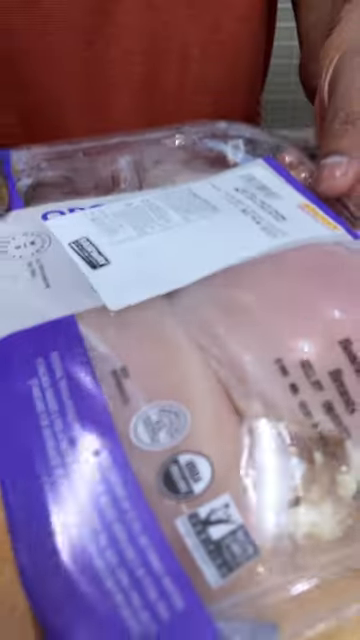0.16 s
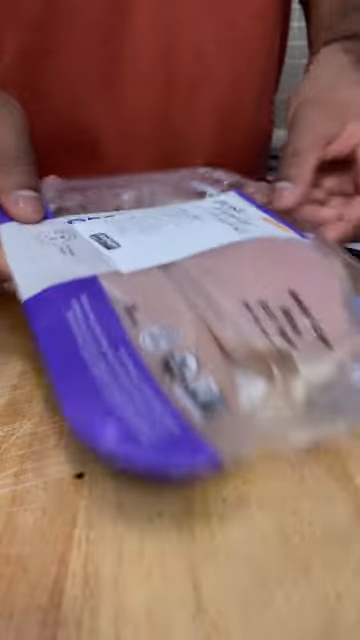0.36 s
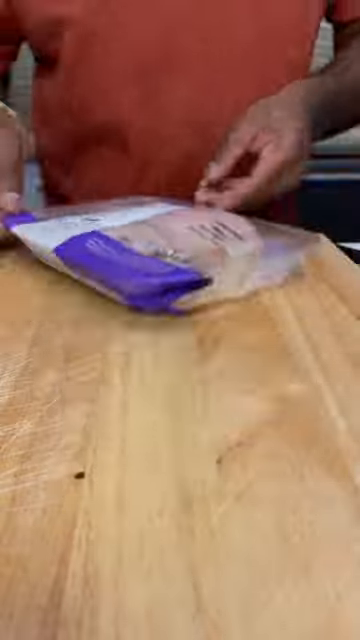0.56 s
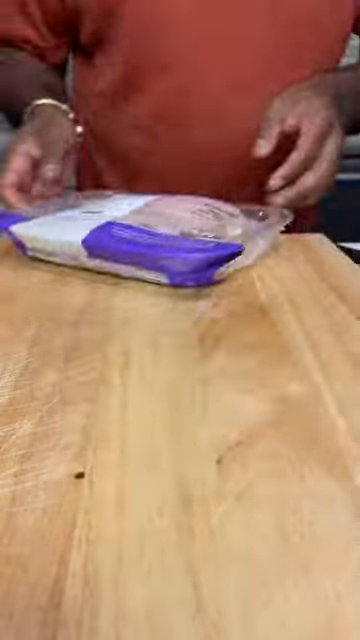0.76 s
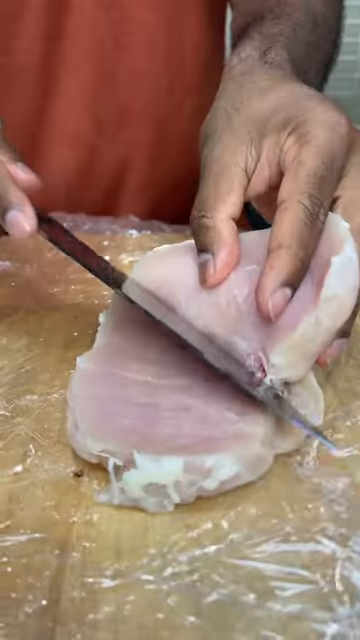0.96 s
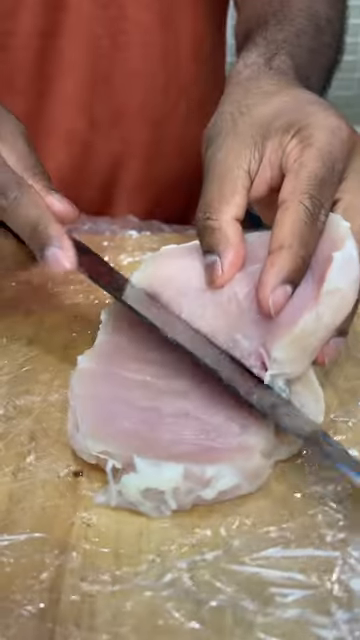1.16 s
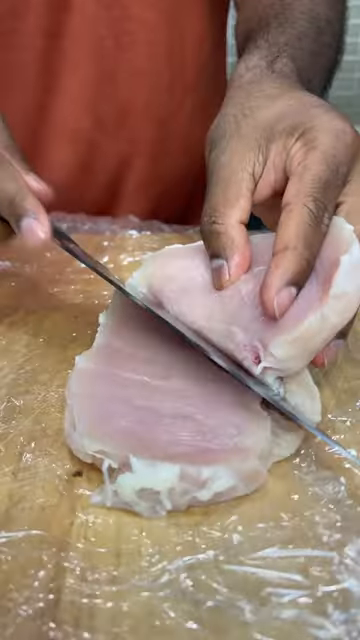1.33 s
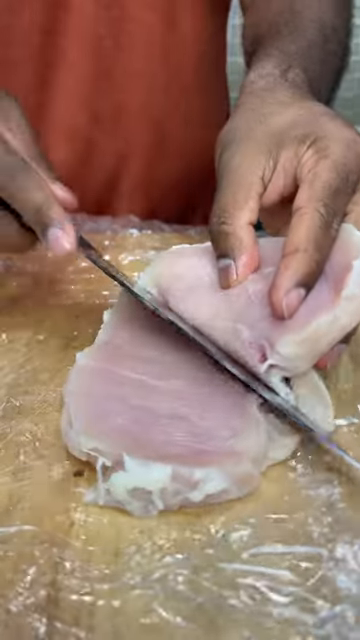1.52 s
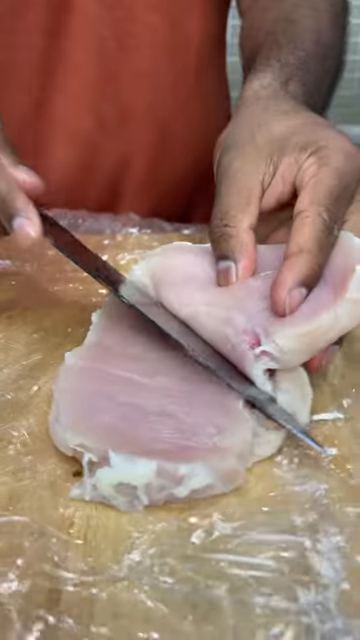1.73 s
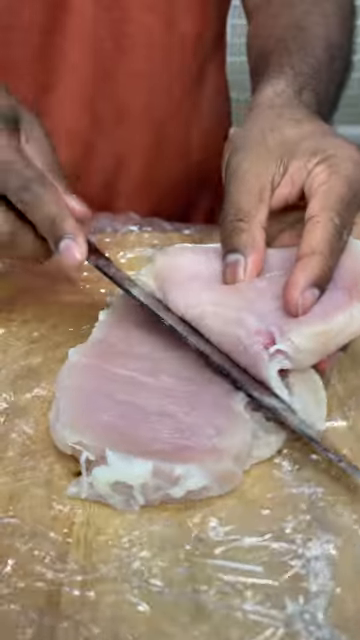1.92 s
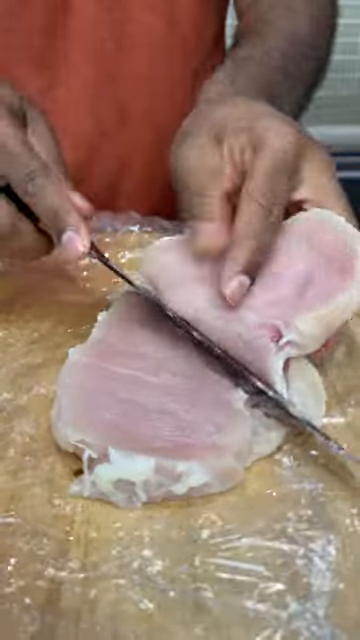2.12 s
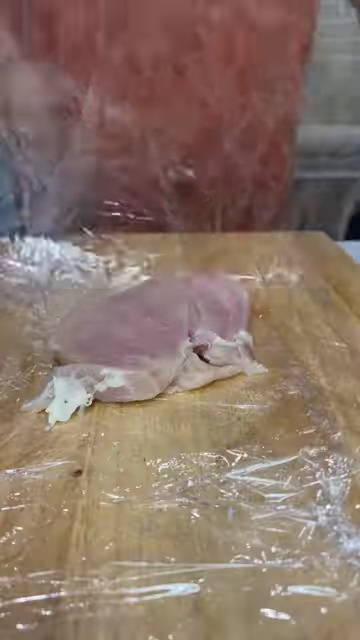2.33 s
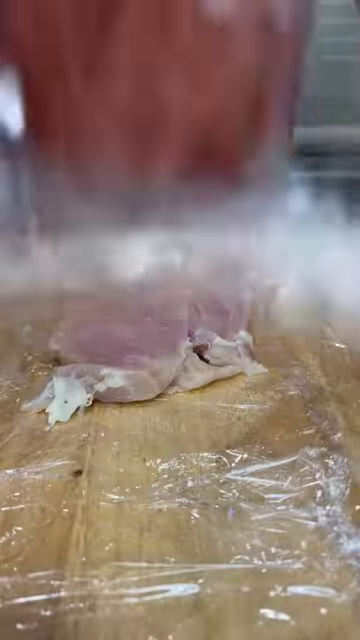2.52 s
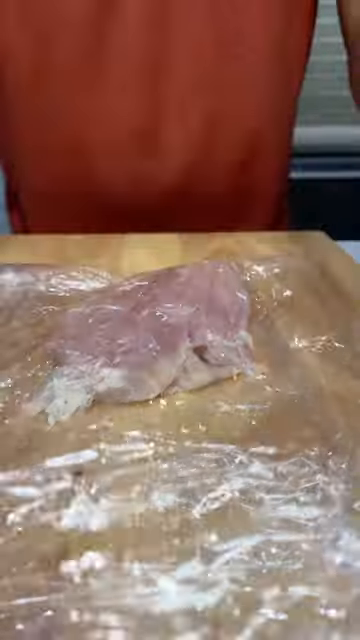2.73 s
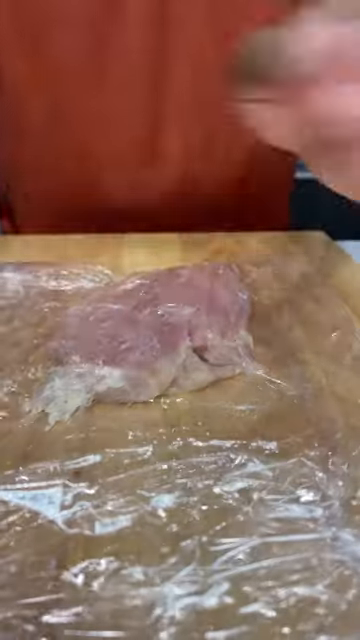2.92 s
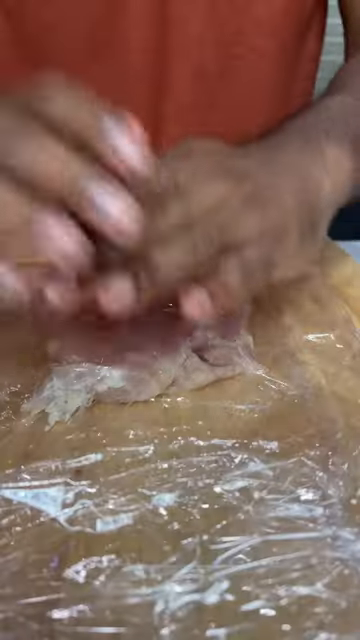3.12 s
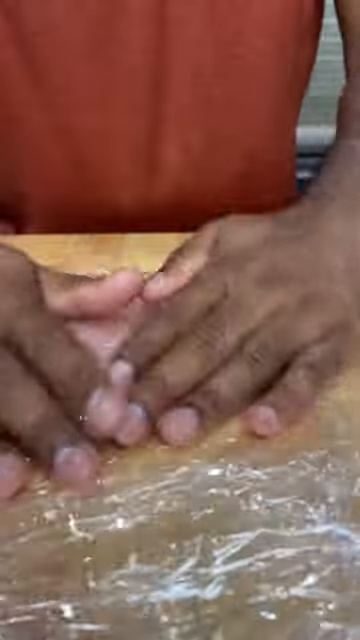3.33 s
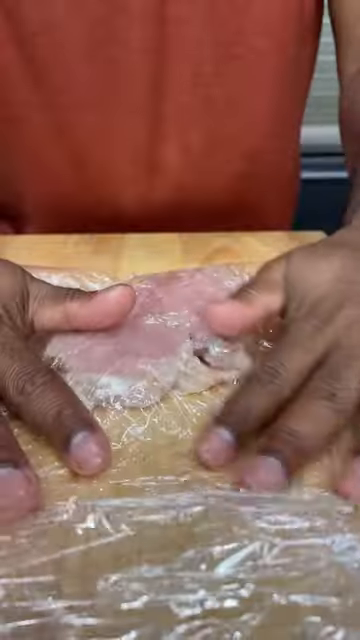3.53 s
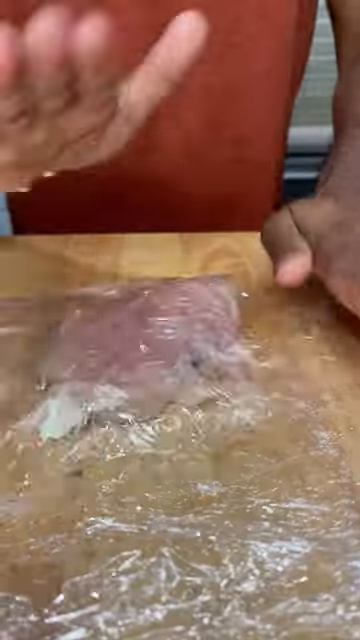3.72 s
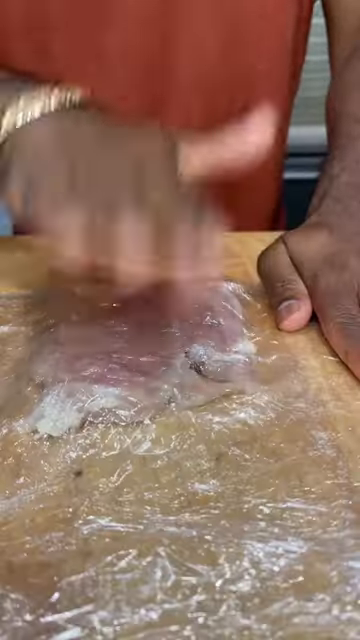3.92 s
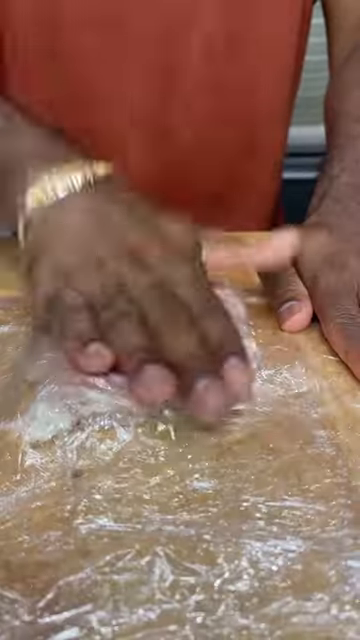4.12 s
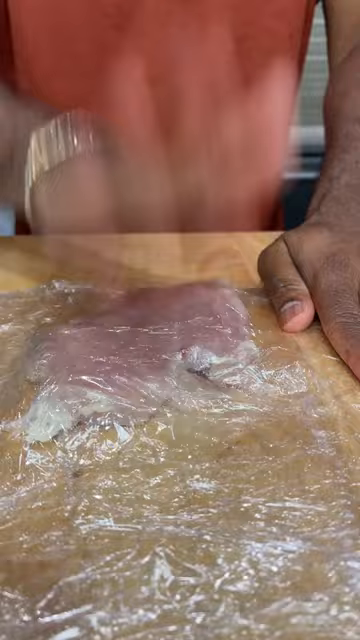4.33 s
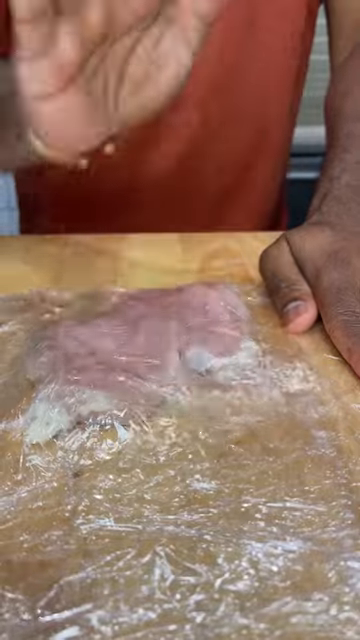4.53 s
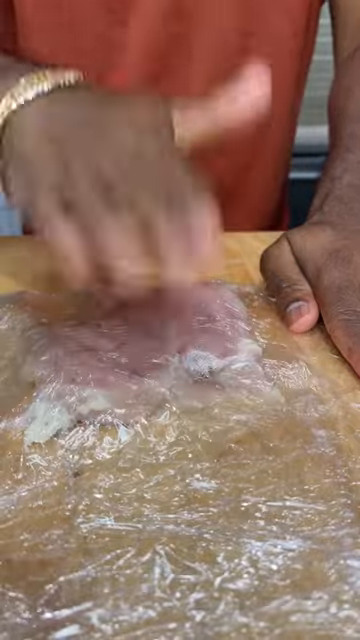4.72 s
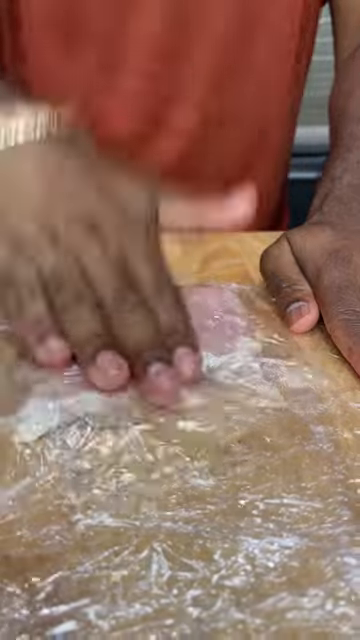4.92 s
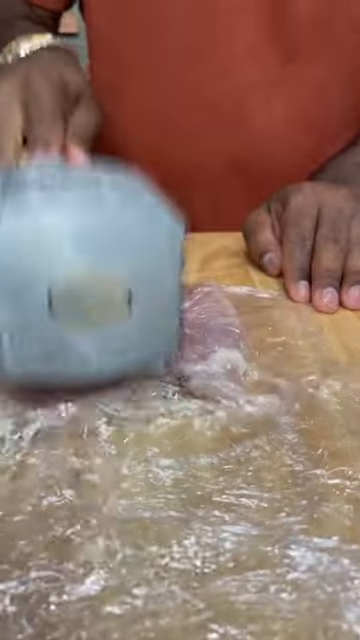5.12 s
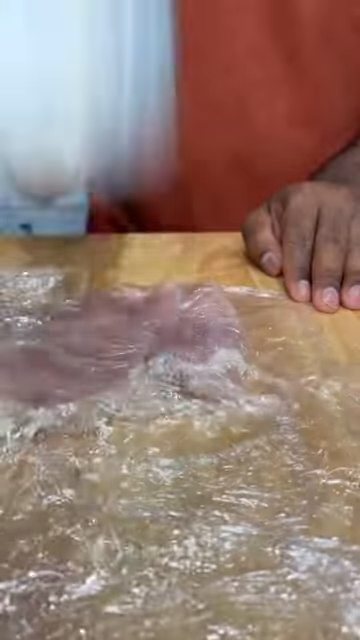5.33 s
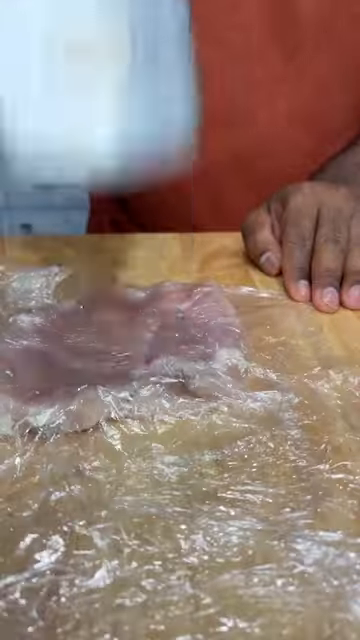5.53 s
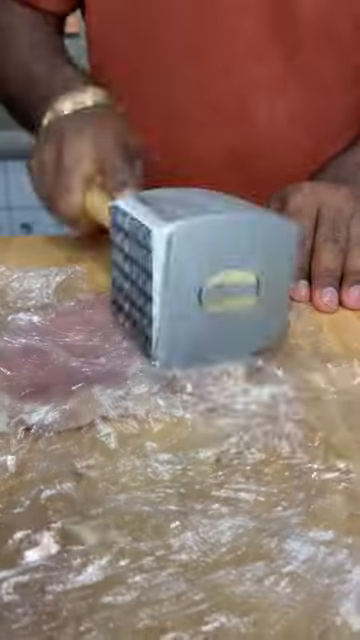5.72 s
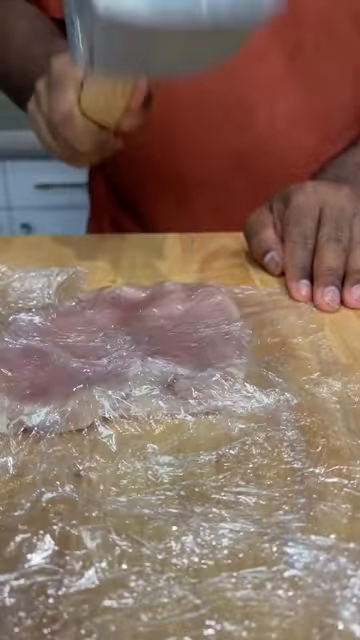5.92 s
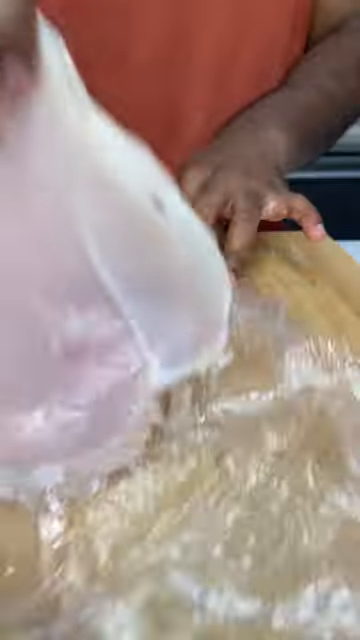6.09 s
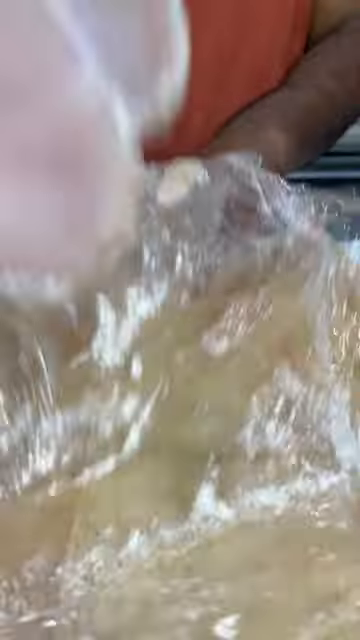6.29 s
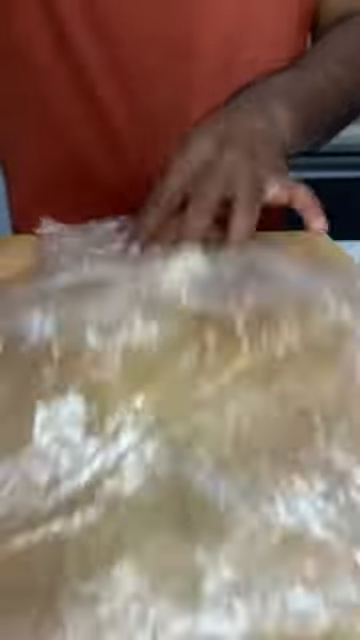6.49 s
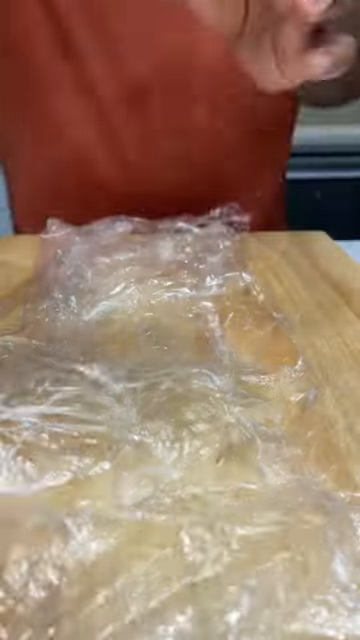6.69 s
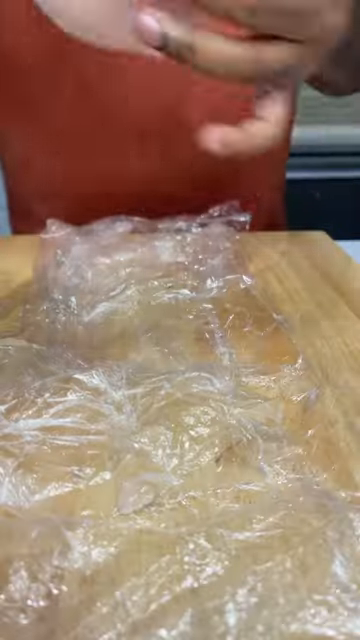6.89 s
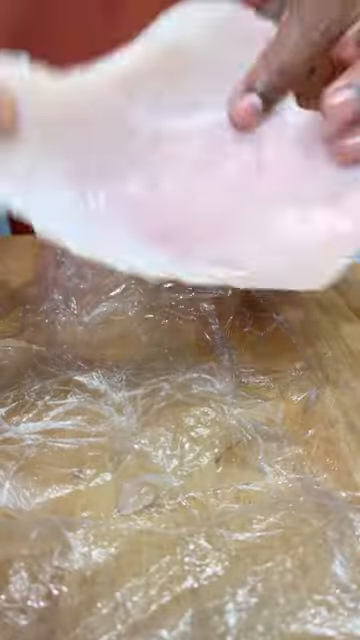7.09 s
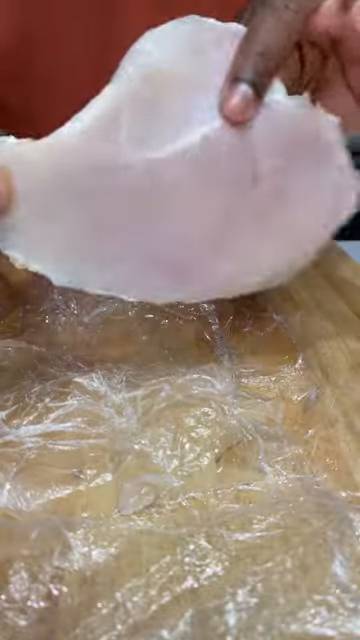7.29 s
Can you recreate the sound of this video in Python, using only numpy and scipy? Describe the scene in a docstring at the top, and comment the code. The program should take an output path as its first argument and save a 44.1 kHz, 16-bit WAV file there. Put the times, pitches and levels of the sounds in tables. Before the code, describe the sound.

A plastic tray slides, a knife cuts meat and cling film crinkles, then wet palm slaps and ringing mallet blows thump on a wooden board.

```python
"""A plastic tray slides and lands on a wooden board, a knife slices meat, cling film rustles, then
five palm slaps and four mallet blows flatten the meat through the film, over a low kitchen rumble.
Each blow is a wet crack of squeezed-out air, a falling thump of board and counter and a short hiss
of room and film; the mallet adds a metal ring. Film and scraping are clumped random clicks in noise;
board, counter and blade ring as damped modes. Two close microphone ports pick it all up."""
import sys
import numpy as np
from scipy import signal
from scipy.fft import rfft, irfft, next_fast_len
from scipy.io import wavfile

SR = 44100
rng = np.random.default_rng(int(sys.argv[2]) if len(sys.argv) > 2 else 0)


def int16_out(signal):
    """Quantize to a 16-bit WAV file."""
    q = np.round(np.clip(np.atleast_2d(signal).T, -1, 1) * 32767)
    wavfile.write(sys.argv[1], SR, q.astype(np.int16))


N = 324135
T = np.arange(N) / SR
FFT_SIZE = next_fast_len(N + 4096)
FREQ_HZ = np.maximum(np.arange(FFT_SIZE // 2 + 1) * SR / FFT_SIZE, 1)

# Blows on the meat. 0 t/s, 1 pop/dB, 2-7 crack per band/dB, 8 crack spread/ms, 9 thump/dB,
# 10 thump delay/ms, 11 thump f/Hz, 12 glide/ms, 13 hiss/dB, 14 knock/dB, 15 metal/dB, 16 cut-off/s,
# 17 settling/dB, 18 hum f/Hz, 19 hum/dB, 20 rebound delay/ms, 21 rebound/dB, 22 rebound f/Hz
BLOW_EVENTS = [(3.8458, -15.5, -17.5, -11, -4, -11.5, -8.5, -3.5, 1.28, -18.5, 4.05, 98, 3.7, -23, -26, -81, 0.81, -54, 86.8, -39.5, 20.2, -21, 6700),
               (4.103, -12.5, -20, -7, -4, -7.5, -21.5, -3, 1.32, -17.5, 5.47, 93.7, 2.05, -25, -40, -84.5, 0.69, -45.5, 87.7, -39, 16, -36, 2500),
               (4.370, -17, -17.5, -6.5, -11, -9.5, -11.5, -1, 1.02, -19.5, 4.1, 97.2, 1.35, -24, -39, -83.5, 0.67, -49.5, 88.2, -39, 17, -32, 3000),
               (4.6243, -16.5, -25, -11.5, -14, -6, -11, -3, 1.07, -18.5, 3.97, 96.6, 3.2, -25.5, -29.5, -85.5, .5, -43.5, 89.4, -41, 15.1, -19, 4500),
               (4.880, -14.5, -21, -15.5, -8, -12, -23.5, -4.5, 1.1, -22.5, 2.8, 97, 2.6, -29.5, -35, -84, 0.11, -52.5, 88.4, -60, 18, -34, 2500),
               (5.047, -27.5, -14.5, -8.5, -9.5, -12, -7.5, -10.5, 1.08, -14.5, 3.87, 105.3, 3.1, -23, -20.5, -57, 0.59, -43.5, 86.3, -38.5, 18, -29, 3000),
               (5.3813, -25, -9, -8.5, -6.5, -11.5, -11.5, -8.5, 0.71, -16, 3.8, 100, 2.5, -25, -20, -54, 0.59, -45, 102.6, -39.5, 33, -37, 2200),
               (5.7195, -26.5, -17.5, -23.5, -6.5, -12, -6, 0, 0.76, -11, 3.45, 94.3, 4.6, -25, -44, -54.5, .5, -53, 87.7, -36, 19, -22, 7000),
               (6.0545, -22.5, -13, -9, -16, -8, -12, -7, 1.32, -10, 4, 98.7, 2.5, -18, -31.5, -55, 0.027, -44, 90.5, -40, 19, -19, 3500)]
RUMBLE_LEVELS = [(0, -40), (3.99, -40), (4.11, -43), (4.95, -47), (5.12, -45), (5.75, -47.5), (6.07, -51),
                 (6.1, -40), (7.35, -40)]  # room rumble: t/s, level/dB


def blows():
    """Palm and mallet hit the meat: crack, pop, thump, ringing modes and a dying hiss."""
    counter_modes = [(111.7, -23, 0.6), (166.3, -24.5, 0.27), (217.2, -24, .55), (265.3, -23.5, .2)]  # f/Hz, level re thump/dB, t60/s
    board_modes = [(210.6, 6, 0.081), (365, -18, 0.0069), (451, -16, 0.21), (636, -6, 0.07),
                   (789, 0, 0.026), (807, -8, 0.12), (990, -7.5, 0.1), (1740, 9, 0.02), (2300, 3, 0.031)]  # f/Hz, level re knock/dB, t60/s
    mallet_modes = [(607, 3.5, 0.99), (650, -4.5, 1.2), (680, -3, 1.5), (789, 3.5, 0.95),
                    (1010, -1.5, 0.73), (1410, -6.5, 1.1)]  # f/Hz, level re metal/dB, t60/s
    hiss_spectrum = [(150, -2), (400, -2.5), (1000, -1.5), (2500, -12), (5000, -8), (8000, -10.5),
                     (11000, -8.5), (12500, -20.5), (13500, -25.5), (16000, -32)]  # room and film: f/Hz, relative level/dB
    out, t = np.zeros((2, N)), T[:SR // 2]
    hiss = coloured(crinkle(900, spread_db=3.1, smooth=1, patchy_db=2.84, broad=.3), hiss_spectrum)
    click = (np.arange(len(t)) == 0) * 1.
    for row in BLOW_EVENTS:
        s, pop_db, *crack_db, spread_ms = row[:9]
        thump_db, delay_ms, thump_hz, glide_ms, hiss_db, knock_db, metal_db, cutoff_s = row[9:17]
        sound = crack(t, crack_db, spread_ms)
        thump_t = np.maximum(t - delay_ms / 1000, 0)
        pop_t = np.maximum(t - (delay_ms - 1.287) / 1000, 0)
        sound[0] += thump(thump_t, thump_db, thump_hz, glide_ms / 1000)
        sound[0] += from_db(pop_db) * falling_pop(pop_t)
        counter_hit = np.roll(click, round(delay_ms * SR / 1000))
        board_hit = np.roll(click, round(2 * spread_ms * SR / 1000))
        sound[0] += from_db(thump_db) * ring_modes(counter_hit, counter_modes)
        sound[0] += from_db(knock_db) * ring_modes(board_hit, board_modes)
        for hz, db, t60_s in mallet_modes:
            waver_db = 8 * drift(44.7, len(t))  # the hand moves
            sound[0] += from_db(metal_db + db + waver_db) * ring(click, hz, t60_s)
        hiss_envelope = (1 - np.exp(-t / .0086)) * (np.exp(-t / .018) + .11 * np.exp(-t / .12))
        start = round(s * SR)
        sound += from_db(hiss_db) * hiss_envelope * hiss[:, start:start + len(t)]
        add(out, s, sound * np.clip((cutoff_s - t) / .0073, 0, 1))
    return out


def crack(t, levels_db, spread_ms):
    """Air and wet film burst unevenly, building as the air is squeezed out."""
    bands = [(587, 1005, 1.69), (1184, 1596, 1.2), (1623, 3060, 1.1), (3000, 5630, 1.32),
             (4400, 6840, 1.19), (8060, 11600, 1.12)]  # low f/Hz, high f/Hz, time stretch/ratio
    sound, noise = np.zeros((2, len(t))), rng.standard_normal((2, 2, len(t)))
    noise *= from_db(3.48 * rng.exponential(1, len(t)))
    for k, (db, (low_hz, high_hz, stretch)) in enumerate(zip(levels_db, bands)):
        age = t * 1000 / (2 * spread_ms * stretch)
        swell = (age * np.exp(1 - age)) ** 4
        burst = band(noise[k % 2] * swell, low_hz, high_hz)
        burst = band(burst, low_hz / 1.055, high_hz * 1.38)
        crest = 2.5 * np.sqrt(np.sum(burst[0] ** 2) / np.sum(swell ** 2))
        sound += from_db(db) * burst / crest
    sound[1] *= .35  # close source: little stray sound
    return sound


def thump(t, db, hz, glide_s, hold_s=.031, fall_s=.0035, rise_s=.0043):
    """Bending waves arrive high first and settle on the counter's pitch; the weight then damps them."""
    settled = 1 - np.exp(-t / glide_s)
    cycles = hz * t + .92 * settled
    damping = 1 + np.exp(np.minimum((t - hold_s) / fall_s, 50))
    envelope = from_db(db) * (1 - .5 * np.exp(-t / rise_s)) * np.exp(-t / .24) / damping
    # harmonics 2 and 3 grow with the square and cube of the strength
    return sum(from_db(weight_db) * envelope ** k * settled ** (2 * k - 2) * sine(k * cycles)
               for k, weight_db in enumerate((0, -6, 1), 1))


def falling_pop(t, top_hz=2200, end_hz=233, fall_s=.00158, peak_s=.00206):
    """A short pop sweeps quickly down in pitch as the blow lands."""
    cycles = end_hz * t + (top_hz - end_hz) * fall_s * (1 - np.exp(-t / fall_s))
    age = t / peak_s
    return (age * np.exp(1 - age)) ** 2 * sine(cycles)


def touches_and_rebounds():
    """Palm or mallet makes brief contact just before and after a blow."""
    touches = [(4.096, -47.5), (4.361, -30.5), (4.6165, -23.5), (4.871, -31), (5.0312, -26),
               (5.3625, -24.5), (5.372, -26), (5.701, -27.5), (5.708, -33), (6.031, -30.5)]  # first contact: t/s, peak/dB
    out = np.zeros((2, N))
    for s, *_, delay_ms, db, hz in BLOW_EVENTS:
        add(out, s + delay_ms / 1000, snap(db, hz, decay_ms=3.5, below=2.4, above=1.7))
    for s, db in touches:
        add(out, s, snap(db, hz=2500, decay_ms=2.3, below=1.9, above=1.9))
    return out


def smacks():
    """Tray, knife and wet film let go; each brief contact rings one pitch."""
    releases = [(.473, -32, 2200, 25), (.5525, -30.5, 776, 17), (.5525, -25, 1750, 12),
                (.563, -28, 1820, 17), (.565, -29, 2630, 12), (1.0705, -36, 2300, 9), (1.082, -45, 2500, 8),
                (3.802, -35.5, 2410, 25), (4.387, -20, 2300, 17), (4.64, -16.5, 2400, 17),
                (4.889, -31, 900, 60), (4.899, -32, 2680, 17), (5.049, -19, 800, 33), (5.42, -36, 2200, 30),
                (5.761, -28, 2400, 37), (6.0606, -16, 2390, 28)]  # t/s, peak/dB, f/Hz, t60/ms
    out, t = np.zeros((2, N)), T[:SR // 10]
    for s, db, hz, t60_ms in releases:
        contact = np.exp(-t * hz * 3) * (1 + .3 * rng.standard_normal((2, len(t))))
        tone = ring(contact, hz, t60_ms / 1000)
        add(out, s, from_db(db) * tone * [[1], [.3]] / np.abs(tone[0]).max())
    return out


def ticks(decay_cycles=6.7):
    """Film and tray snap in single ticks."""
    snaps = [(0.171, -46, 5400), (.34, -33, 2390), (.552, -27, 3000), (.564, -26, 4000), (1.018, -46, 2600),
             (1.0705, -36, 5030), (1.071, -40, 10500), (1.13, -42, 6200), (1.137, -35, 7240),
             (1.156, -38, 12000), (1.159, -31, 11000), (1.194, -43, 11000), (1.851, -41, 5000),
             (1.958, -50, 6000), (2.043, -43, 10500), (2.068, -49, 8000), (2.12, -45, 9000),
             (2.189, -42.5, 10100), (2.258, -32.5, 7540), (2.309, -33, 9000), (2.333, -36, 10000),
             (2.341, -42, 9000), (2.358, -40, 9000), (2.365, -39, 6500), (2.379, -33, 10500),
             (2.385, -31, 10500), (2.4075, -23, 10500), (2.411, -44, 3000), (2.424, -37, 10000),
             (2.445, -41, 7500), (2.459, -31, 9000), (2.499, -39, 10500), (2.516, -35, 10000),
             (2.526, -39, 7000), (2.535, -37, 9000), (2.541, -38, 7500), (2.5463, -23, 10500),
             (2.559, -37, 10500), (2.567, -37, 10500), (2.625, -37, 10500), (2.68, -43, 9000),
             (2.794, -45, 10500), (2.84, -32, 10500), (2.884, -35, 10500), (3.05, -43, 9000),
             (3.212, -42, 5970), (3.231, -35, 10500), (3.246, -35, 9000), (3.256, -41, 5000),
             (3.277, -33, 5000), (3.304, -37, 9000), (3.343, -35, 9000), (3.352, -35, 8000),
             (3.413, -33, 10000), (3.435, -34, 9000), (3.4903, -26, 10500), (3.514, -24, 10500),
             (3.529, -26, 9000), (3.541, -36, 6000), (3.546, -33, 9500), (3.552, -33, 4000),
             (3.577, -31, 10500), (3.607, -27, 8000), (3.634, -32, 9000), (3.65, -37, 9000),
             (3.6746, -33, 8150), (3.682, -37.5, 1490), (3.683, -38, 6000), (3.791, -46, 2500),
             (3.805, -35, 10500), (5.762, -40, 1300), (6.094, -36, 9000), (6.176, -33, 10500),
             (6.2, -35, 3600), (6.243, -37, 9000), (6.31, -33, 9500), (6.32, -30, 10500),
             (6.353, -29, 9000), (6.417, -46, 9000), (6.532, -39, 10500), (6.541, -38, 3440),
             (6.542, -35, 10500), (6.635, -40, 8000), (6.663, -34, 9100), (6.672, -34, 9940),
             (6.89, -46, 7040), (7.013, -36, 10550)]  # t/s, peak/dB, centre f/Hz
    out = np.zeros((2, N))
    for s, db, hz in snaps:
        add(out, s, snap(db, hz, decay_ms=1000 * decay_cycles / hz, below=2.2, above=1.76))
    return out


def snap(db, hz, decay_ms, below, above):
    """Sharp edge plus noise burst, from hz / below to hz * above, with a narrow core."""
    t = T[:SR // 20]
    burst = rng.standard_normal((2, len(t))) * np.exp(-t * 1000 / decay_ms)
    burst[0, 0] += 2.5
    for _ in range(2):
        burst = band(burst, hz / below, min(hz * above, 14000))
    burst += .95 * band(burst, hz / 1.2, hz * 1.15)
    return from_db(db) * burst / np.abs(burst[0]).max()


def rustle_and_scrape(rest_film_db=-75, rest_scrape_db=-63.5, lead_in_db=8.5, settle_film_db=-18.5):
    """Hand, knife and film rub in strokes; a brief hiss rises into each blow, meat and film settle."""
    strokes = [(0, .01, 0.044, 0.15, -59, -49.5), (0.346, 0.34, 0.29, .03, -54, -48.5),
               (0.551, 0.034, 0.011, 0.22, -36, -45.5), (0.948, 0.22, .01, 0.14, -56.5, -79),
               (1.073, .02, 0.11, 0.11, -54.5, -69), (1.306, 0.21, 0.28, 0.021, -58.5, -87),
               (1.715, 0.25, .04, 0.25, -53.5, -61.5), (1.853, 0.036, 0.0093, 0.17, -50, -54),
               (2.028, 0.16, .01, 0.17, -60.5, -74), (2.385, 0.12, 0.015, 0.15, -44.5, -51.5),
               (2.521, 0.061, 0.032, 0.16, -45, -53), (2.626, .1, 0.23, .1, -55.5, -60),
               (2.847, 0.089, 0.049, 0.09, -42.5, -50.5), (3.223, 0.02, 0.068, .05, -50.5, -48.5),
               (3.271, 0.072, 0.16, 0.16, -40, -53), (3.493, 0.21, 0.071, 0.2, -38.5, -48.5),
               (3.599, 0.062, 0.071, .02, -44, -60), (3.804, 0.021, 0.0052, 0.018, -39, -44.5),
               (3.82, .01, 0.0075, 0.016, -43, -61), (4.99, .01, 0.028, .02, -62, -70),
               (6.075, 0.0085, 0.12, 0.22, -43, -49), (6.308, 0.17, 0.017, 0.038, -42, -45.5),
               (6.348, 0.029, 0.024, 0.09, -51.5, -54), (6.415, .04, 0.079, 0.21, -47.5, -65),
               (6.541, 0.12, 0.0048, 0.033, -47.5, -47), (6.655, 0.13, 0.0093, 0.093, -51, -57.5),
               (6.904, 0.057, 0.022, 0.059, -66, -68), (7.006, 0.041, 0.0075, 0.28, -56.5, -61.5)]  # full-level t/s, rise/s, hold/s, fall/s, film/dB, scrape/dB
    film_spectrum = [(2500, -21.5), (4000, -11), (6000, -6), (8000, -2), (10500, 3.5), (12000, -1.5),
                     (13300, -12), (14500, -7.5), (16000, -30)]  # f/Hz, relative level/dB
    scrape_spectrum = [(500, -6), (1100, -2.5), (2000, -3), (2600, -2), (3600, -6.5), (5500, -9.5),
                       (8000, -19.5)]  # f/Hz, relative level/dB
    rumble_db = np.interp(T, *np.transpose(RUMBLE_LEVELS))
    dip_db = 3.9 * (rumble_db - rumble_db[0])  # the resting hiss sinks with the rumble
    film_power = from_db(2 * (rest_film_db + dip_db))
    scrape_power = from_db(2 * (rest_scrape_db + dip_db))
    for s, rise_s, hold_s, fall_s, film_db, scrape_db in strokes:
        power = stroke_power(s, rise_s, hold_s, fall_s)
        film_power += from_db(2 * film_db) * power
        scrape_power += from_db(2 * scrape_db) * power
    for row in BLOW_EVENTS:
        s, cutoff_s, settle_db = row[0], row[16], row[17]
        power = stroke_power(s, rise_s=.024, hold_s=0, fall_s=.44) * (T < s + cutoff_s)
        power *= from_db(2 * (settle_db + lead_in_db * (T < s)))
        film_power += from_db(2 * settle_film_db) * power
        scrape_power += power
    film = coloured(crinkle(600, spread_db=3.75, smooth=.5, patchy_db=2.65, broad=.55), film_spectrum)
    scrape = coloured(grains(600, spread_db=.94, smooth=1), scrape_spectrum)
    return np.sqrt(film_power) * film + np.sqrt(scrape_power) * scrape


def stroke_power(s, rise_s, hold_s, fall_s, range_db=28.5):
    """Power of one stroke: gains range_db over the rise, holds, loses it over the fall."""
    distance = np.maximum(s - T, 0) / rise_s + np.maximum(T - s - hold_s, 0) / fall_s
    return from_db(-2 * range_db * distance)


def crinkle(per_s, spread_db, smooth, patchy_db, broad):
    """Each fold of film crackles on and off in its own band, over broadband clicks."""
    edges_hz = [120, 1500, 3000, 4800, 7000, 9200, 11500, 18000]  # band edges: f/Hz
    folds = np.zeros((2, N))
    for low_hz, high_hz in zip(edges_hz, edges_hz[1:]):
        gain = from_db(patchy_db * drift(30, N)) * np.sqrt(high_hz - low_hz)
        folds += gain * unit_rms(band(grains(per_s, spread_db, smooth), low_hz, high_hz))
    return unit_rms(folds) + broad * grains(per_s, spread_db, smooth=0)


def grains(per_s, spread_db, smooth, clump_db=6, clumps_per_s=45):
    """Two rows of uneven, clumped clicks over a share of smooth noise."""
    sizes = from_db(spread_db * np.minimum(rng.exponential(1, N), 5))
    clumps = from_db(clump_db * drift(clumps_per_s, N))
    clicks = unit_rms(sizes * (rng.random(N) < clumps * per_s / SR))
    return clicks * rng.choice([-1, 1], (2, N)) + smooth * rng.standard_normal((2, N))


def tray(bump_hz=96, bump_s=.021):
    """The tray scrapes hollowly, catches one resonance, bumps along and lands."""
    slide_levels = [(.26, -56), (.342, -43.5), (.485, -40.5), (.51, -36), (.54, -40), (.57, -49),
                    (.66, -48), (.76, -56.5)]  # t/s, level/dB
    slide_spectrum = [(900, -34), (1400, -4.5), (1900, -3), (2300, 1.5), (2900, -7.5), (4500, -10.5)]  # f/Hz, relative level/dB
    resonance = (.511, .009, -31, 2020, 170)  # t/s, half length/s, peak/dB, f/Hz, waver/Hz
    bumps = [(.309, -44), (.378, -36), (.396, -36), (0.579, -24)]  # t/s, level/dB
    slide_db = np.interp(T, *np.transpose(slide_levels), left=-120, right=-120)
    out = from_db(slide_db) * coloured(grains(800, spread_db=3.8, smooth=1.3), slide_spectrum)
    s, half_s, db, hz, waver_hz = resonance
    swell = np.exp(-((T - s) / half_s) ** 2 / 2)
    pitch_hz = hz + waver_hz * drift(200, N)
    out[0] += from_db(db) * swell * sine(np.cumsum(pitch_hz * (swell > 1e-4)) / SR)
    t = T[T < bump_s]
    bump = -sine(bump_hz * t) * np.sqrt(np.sin(np.pi * t / bump_s))
    for s, db in bumps:
        add(out[0], s, from_db(db) * bump)
    return out


def knife_taps():
    """The blade touches the board, bounces and rings."""
    taps = [(1.851, -44), (1.867, -46.5)]  # t/s, level/dB
    blade_modes = [(2500, -5, 0.029), (3880, -11, .06), (4500, -8, .08), (5760, -12, .08),
                   (6000, -1.5, 0.083), (7320, -5, 0.14), (8140, 4, 0.12), (10700, -6, .1),
                   (10800, 0, 0.13), (12630, -2, .1)]  # f/Hz, level re tap/dB, t60/s
    clicks = sum((np.arange(N) == round(s * SR)) * from_db(db) for s, db in taps)
    return np.array([ring_modes(clicks, blade_modes), np.zeros(N)])


def counter_hum(from_s=.043, until_s=.18, fade_s=.0071, beat_hz=20.9):
    """The counter hums after a blow or the tray's landing: swells, drops, stops by the next blow."""
    out = np.zeros((2, N))
    next_times_s = [row[0] for row in BLOW_EVENTS[1:]] + [T[-1]]
    hums = [(row[0], min(row[16], next_s - row[0]), row[18], row[19])
            for row, next_s in zip(BLOW_EVENTS, next_times_s)]
    tray_landing = (.578, .25, 82, -41.5)
    for s, length_s, hz, db in hums + [tray_landing]:
        t = T[:round(length_s * SR)]
        shape_db = np.interp(t, [from_s, until_s, until_s + 2 * fade_s], [-2.5, 0, -12])
        gate = np.clip(np.minimum(t - from_s + fade_s, length_s - t) / fade_s, 0, 1)
        tone = np.sqrt(2) * (sine(hz * t) + .18 * sine((hz + beat_hz) * t))
        add(out[0], s, gate * from_db(db + shape_db) * tone)
    return out


def room_rumble():
    """Low room noise; its level dips during the blows."""
    spectrum = [(12, -44.5), (20, -32.5), (30, -61), (42, -4), (135, 2), (205, -8), (240, -4.5),
                (306, -16.5), (349, -6), (426, -18.5), (532, -15), (793, -24), (2300, -32), (3500, -58),
                (4000, -55.5), (5200, -54), (8800, -120)]  # f/Hz, relative level/dB
    level_db = np.interp(T, *np.transpose(RUMBLE_LEVELS))
    return from_db(level_db) * coloured(rng.standard_normal((2, N)), spectrum)


def from_db(db):
    """Gain of a level in dB."""
    return 10 ** (np.asarray(db) / 20)


def sine(cycles):
    """Sine of a phase in cycles."""
    return np.sin(2 * np.pi * cycles)


def unit_rms(x):
    """Scale to rms 1."""
    return x / np.sqrt(np.mean(x ** 2) + 1e-20)


def drift(per_s, length):
    """Random curve, spread about 1; holds after 800 knots."""
    knots = rng.standard_normal(800)
    return np.interp(np.arange(length) * per_s / SR, np.arange(len(knots)), knots)


def at_hz(points):
    """Interpolate (f/Hz, value) onto the FFT grid in log frequency."""
    hz, value = np.transpose(points)
    return np.interp(np.log(FREQ_HZ), np.log(np.maximum(hz, 1)), value)


def coloured(x, spectrum):
    """Shape noise by a spectrum; rms 1."""
    return unit_rms(irfft(rfft(x, FFT_SIZE) * from_db(at_hz(spectrum)), FFT_SIZE)[..., :N])


def band(x, low_hz, high_hz):
    """Causal band-pass."""
    return signal.sosfilt(signal.butter(2, [low_hz, high_hz], "band", fs=SR, output="sos"), x)


def ring(clicks, hz, t60_s):
    """Resonator: a unit click starts a decaying sine of height 1."""
    radius, angle = from_db(-60 / (t60_s * SR)), 2 * np.pi * hz / SR
    return signal.lfilter([0, np.sin(angle)], [1, -2 * radius * np.cos(angle), radius ** 2],
                          clicks + 1e-18)


def ring_modes(clicks, modes):
    """Sum of a struck body's damped modes."""
    return sum(from_db(db) * ring(clicks, hz, t60_s) for hz, db, t60_s in modes)


def add(track, s, sound):
    """Mix a sound in at time s."""
    start = round(s * SR)
    track[..., start:start + sound.shape[-1]] += sound[..., :N - start]


def microphone_ports(direct, stray):
    """Two close ports differ in level and phase; stray sound enters them with opposite signs."""
    stray_gain = [(60, -39), (250, -31), (600, 2.5), (1400, -5.5), (3000, -9), (10000, -25)]  # sound from elsewhere: f/Hz, gain/dB
    balance = [(60, -1), (110, -1.5), (200, -2.5), (380, -8), (700, -3.5), (1290, 1), (2380, -0.5),
               (4400, -1), (8120, 2), (15000, 1.5)]  # f/Hz, left minus right/dB
    left_lead = [(100, 0), (1500, .15), (3900, .8), (4570, 1.8), (5250, 5.4), (5700, 6.1), (7500, 7.7),
                 (8350, 8.8), (9000, 9.4), (10500, 11.2), (11800, 12.1), (14000, 13.2), (16500, 15.5)]  # f/Hz, phase/rad
    mid = rfft(direct, FFT_SIZE)
    side = rfft(stray, FFT_SIZE) * from_db(at_hz(stray_gain))
    tilt = from_db(at_hz(balance) / 2)
    left = (mid + side) * tilt
    right = (mid - side) * np.exp(-1j * at_hz(left_lead)) / tilt
    return irfft(np.array([left, right]), FFT_SIZE)[:, :N]


def scene():
    """Sum all sources (row 0 direct, row 1 stray) and feed both ports."""
    mix = room_rumble() + rustle_and_scrape() + tray() + knife_taps()
    mix += blows() + counter_hum() + touches_and_rebounds() + smacks() + ticks()
    return microphone_ports(*mix)


def record(dry, mic_top_hz=11570, cutoff_hz=16900):
    """The microphones fade above their top resonance; peaks are rounded, the top is cut."""
    faded = signal.sosfilt(signal.butter(4, mic_top_hz, fs=SR, output="sos"), dry)
    rounded = faded / (1 + np.abs(faded) ** 6) ** (1 / 6)
    return .88 * signal.sosfilt(signal.cheby2(12, 70, cutoff_hz, fs=SR, output="sos"), rounded)


dry = scene()
out = record(dry)
int16_out(out)
```